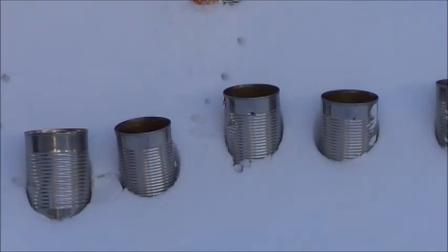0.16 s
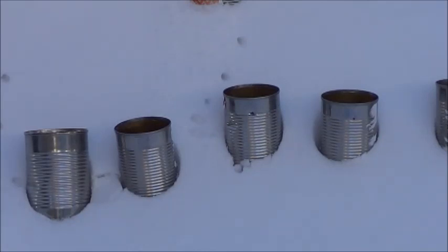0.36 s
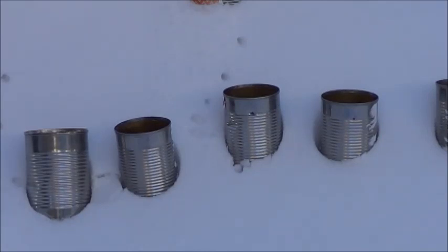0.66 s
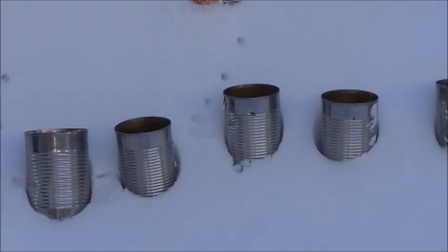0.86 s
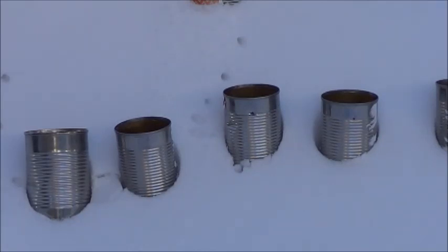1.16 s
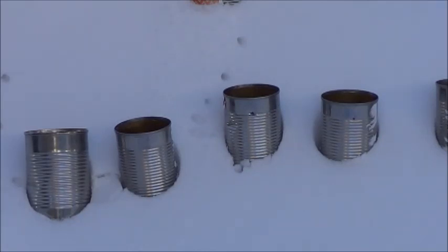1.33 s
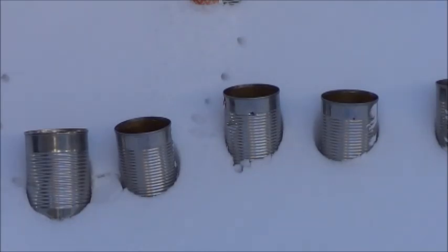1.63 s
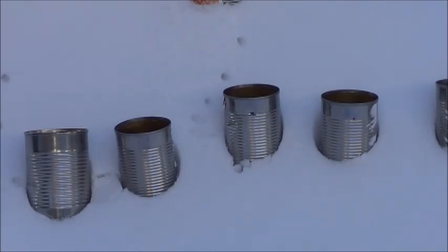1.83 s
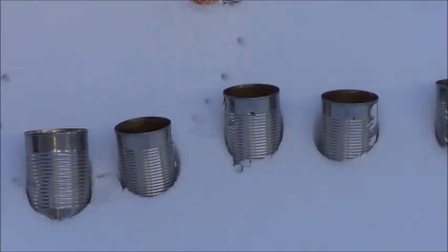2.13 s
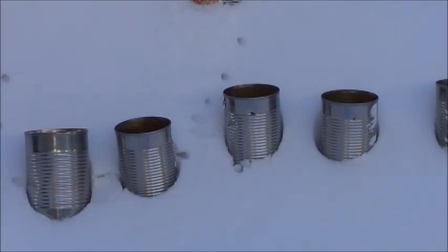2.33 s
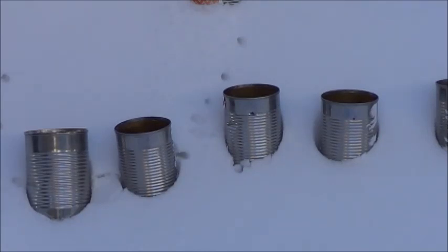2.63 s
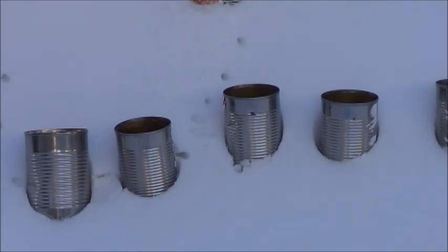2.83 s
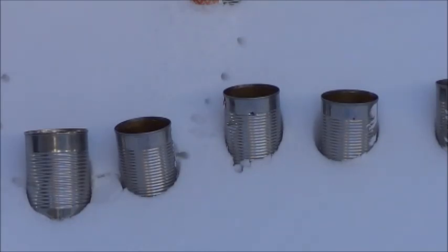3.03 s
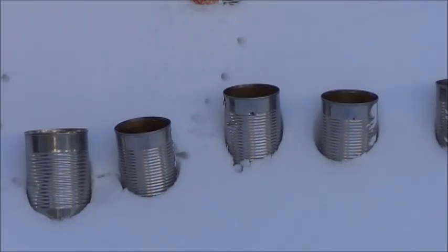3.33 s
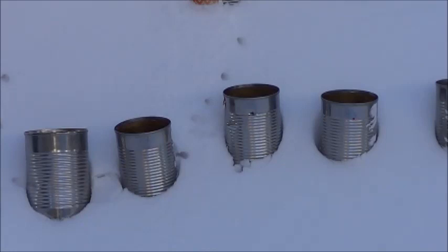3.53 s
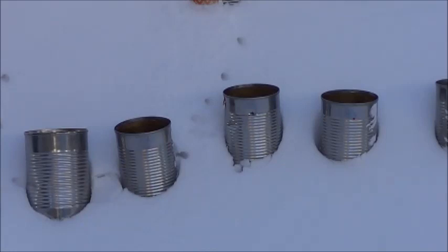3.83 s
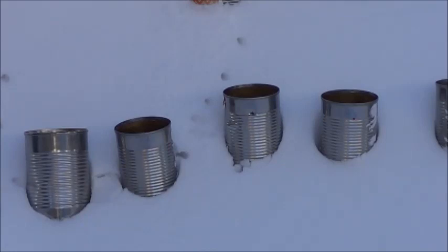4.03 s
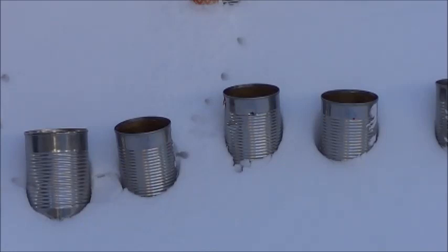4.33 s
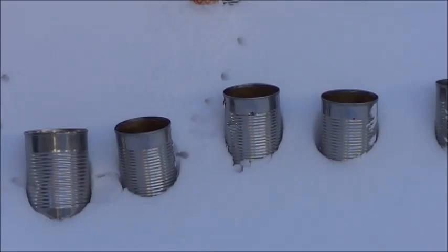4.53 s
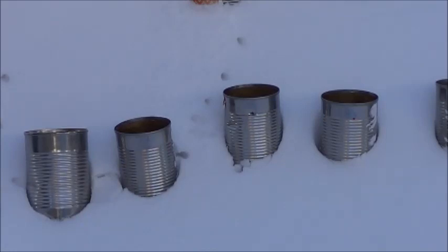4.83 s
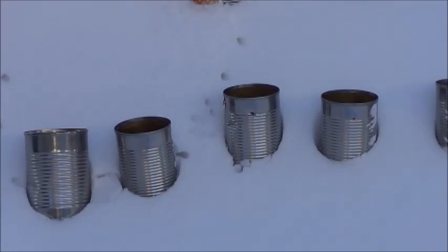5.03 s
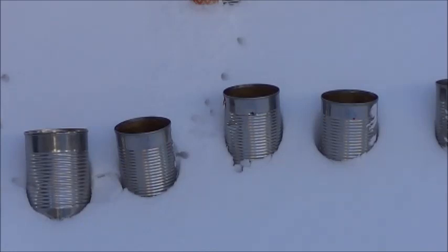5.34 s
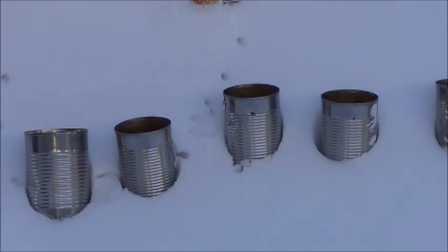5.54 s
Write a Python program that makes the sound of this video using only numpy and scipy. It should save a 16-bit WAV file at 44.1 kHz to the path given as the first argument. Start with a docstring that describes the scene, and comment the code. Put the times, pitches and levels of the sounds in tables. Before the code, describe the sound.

Crisp metal clicks, a cracking air-pistol shot with a short outdoor echo, recocking, low wind thumps, a second shot, then more clicks.

```python
"""Small far birds chip over rumble, hiss and a thin electronic whine, which last throughout: shaped noise and tones.
A gas pellet revolver is cocked, as resonant clicks; a bird pips and far whistles glide down.
The first shot is a hammer knock, a crack, a pop of filtered noise bursts and a swell of echoes round a snowy yard.
The action clicks and is cocked again, a gust of modulated low noise buffets the microphone, a second shot follows,
and the action is cocked once more. The gain ducks at each shot, holds, then creeps back up."""
import sys
import numpy as np
from scipy import signal
from scipy.fft import rfft, irfft
from scipy.io import wavfile
from scipy.ndimage import uniform_filter1d, minimum_filter1d

SR = 44100
rng = np.random.default_rng(int(sys.argv[2]) if len(sys.argv) > 2 else 0)


def to_wav(sig):
    """Store sig (one row per channel, or 1-D mono) as 16-bit WAV at the path in sys.argv[1].

    Samples outside -1..1 are clipped; the rate is SR.
    """
    pcm = np.clip(np.atleast_2d(sig), -1, 1) * 32767
    pcm = np.round(pcm).astype(np.int16)
    wavfile.write(sys.argv[1], SR, pcm.T)  # frames by channels


N = 250929
TIME = np.arange(N) / SR
HIT_TIME = TIME[:4096]  # time axis of a short sound


def undb(db):
    """Decibel definition: turn a level into an amplitude ratio."""
    return 10 ** (np.asarray(db) / 20)


def unit(x):
    """Normalization: scale to rms 1."""
    return x / np.sqrt(np.mean(x ** 2))


def sized(x, db):
    """Energy scaling: give a short sound, channels summed, the energy of 10 ms at this level."""
    return x * undb(db) * np.sqrt(SR / 100 / np.sum(x ** 2))


def ramp(t, start_s, length_s):
    """Linear envelope: rise from 0 to 1."""
    return np.clip((t - start_s) / length_s, 0, 1)


def bump(t, centre_s, width_s):
    """Gaussian envelope: a bell-shaped swell."""
    return np.exp(-((t - centre_s) / width_s) ** 2)


def colour(x, points):
    """Minimum-phase filtering: a causal (hz, db) response from the folded cepstrum."""
    size = 4096
    hz, db = np.transpose(points)
    log_hz = np.log(np.fft.rfftfreq(size, 1 / SR) + 1)
    log_gain = np.log(undb(np.interp(log_hz, np.log(hz), db)))
    cepstrum = irfft(log_gain)
    cepstrum[1:size // 2] *= 2
    cepstrum[size // 2 + 1:] = 0
    response = irfft(np.exp(rfft(cepstrum)))
    return signal.fftconvolve(x, response[None], axes=-1)[:, :x.shape[-1]]


def resonate(x, hz, width_hz):
    """Simple resonance: one mode with gain 1 at its centre."""
    return signal.lfilter(*signal.iirpeak(hz, hz / width_hz, fs=SR), x)


def ring(x, hz, width_hz, db):
    """Cascaded resonance: two equal modes give steep skirts, at a set energy."""
    once = resonate(x, hz, width_hz)
    return sized(resonate(once, hz, width_hz), db)


def dull(x, hz, order=1):
    """Low-pass filtering: treble falls away above a cutoff."""
    return signal.sosfilt(signal.butter(order, min(hz, SR / 2 - 1), fs=SR, output="sos"), x)


def noise(likeness, size=N):
    """Partial coherence: stereo noise with a given left-right correlation."""
    mid, side = rng.standard_normal((2, size))
    c = np.clip(likeness, 0, 1)
    mid = mid * np.sqrt((1 + c) / 2)
    side = side * np.sqrt((1 - c) / 2)
    return np.array([mid + side, mid - side])


def burst(decay_s, likeness):
    """Exponential decay: a puff of noise that starts at once and dies away."""
    return noise(likeness, size=len(HIT_TIME)) * np.exp(-HIT_TIME / max(decay_s, 1 / SR))


def click(decay_s, likeness):
    """Gradual onset: a noise burst takes a moment to build up, then dies away."""
    return burst(decay_s, likeness) * (1 - np.exp(-HIT_TIME / 0.00068))


def widen(x, points):
    """Mid-side decomposition: colour the difference between left and right."""
    mid = (x[0] + x[1]) / 2
    side = colour((x[:1] - x[1:]) / 2, points)[0]
    return np.array([mid + side, mid - side])


def add(out, s, x, pan_db=0):
    """Superposition: mix a sound in at a time and a left-minus-right balance."""
    i = int(s * SR)
    out[:, i:i + x.shape[1]] += x[:, :N - i] * undb([[pan_db / 2], [-pan_db / 2]])


# shots: pop_s, level_db (scales fronts and echoes), hammer_lead_s
SHOTS = [(2.3053, -1, 0.0068), (4.9418, -1.5, .0075)]
# sharp pressure fronts: after_pop_s, energy_db, decay_s, dull_above_hz, left_minus_right_db
FRONTS = [(-.0023, -27.5, 0.00029, 14000, -4), (0, -23.5, 0.00025, 4000, -12),
          (.0082, -26, 0.00032, 8000, 2), (0.0882, -18, 0.00096, 7000, 0)]
# spectrum of the gas burst: frequency_hz, gain_db
BURST_COLOUR = [(40, -13), (200, -13.5), (500, -2.5), (1100, 3.5), (2500, -3), (7000, -4.5), (11000, 2.5),
                (15500, -2)]
# hollow echoes from large surfaces: after_pop_s, energy_db, centre_hz
HOLLOWS = [(.031, -29, 2570), (.039, -38, 1340), (.0525, -17.5, 1630), (.051, -17.5, 2900),
           (.061, -29, 900), (.094, -27, 1900), (.102, -28.5, 915), (.105, -23.5, 3460)]
HOLLOW_WIDTH_HZ, HOLLOW_DECAY_S = 720, 0.004  # width of each of two cascaded resonances; burst decay
HAMMER_HZ = 1640


def shots(echo):
    """Impulsive radiation and specular reflection: a fixed gun gets the same echo pattern twice."""
    out = np.zeros((2, N))
    thud = ring(signal.unit_impulse(len(HIT_TIME))[None], 384, 430, 0)  # the low push behind every front
    arrivals = [(0.0026, echo, 0)]
    for s, db, decay, hz, pan in FRONTS:
        gas = colour(burst(decay, 1.0), BURST_COLOUR)
        arrivals.append((s, sized(dull(gas, hz), db) + undb(db - 27) * thud, pan))
    for s, db, hz in HOLLOWS:
        arrivals.append((s, ring(burst(HOLLOW_DECAY_S, 1.0), hz, HOLLOW_WIDTH_HZ, db), 0))
    for s, db, lead in SHOTS:
        # the hammer scrapes forward and knocks the valve open
        add(out, s - lead - .003, sized(metal(burst(0.009, 0.31)), -35), pan_db=-18)
        add(out, s - lead, ring(burst(0.00052, 0.69), HAMMER_HZ, 810, -29.0), pan_db=-14.5)
        for delay, sound, pan in arrivals:
            add(out, s + delay, undb(db) * sound, pan)
    return out


# spectrum of the yard's echo: frequency_hz, gain_db
YARD_COLOUR = [(60, -22), (190, -21), (400, -1), (580, -8.5), (900, -3), (1400, 0.5), (2300, -0.5),
               (3400, 0), (4300, 0.5), (7300, 0), (9500, 3), (12000, -0.5), (15500, -5)]
# pitches that the echoes reinforce: pitch_hz, width_hz, gain_db
YARD_RINGS = [(716, 20, 7.5), (867, 15, 7.5), (976, 28, 6), (1653, 11, 4), (2120, 33, 3), (2200, 23, 5.5),
              (2640, 20, 0), (2670, 16, -11), (2870, 18, 6.5), (3290, 43, 6.5), (3560, 25, -6),
              (6250, 18, -1), (8660, 19, 4)]
# scatter from things close by, a swell from surrounding walls and trees, then a steady decay;
# levels are relative to one another, and T60 is the time to fall by 60 dB
NEAR_DB, NEAR_T60_S = -20.5, 0.24
SWELL_DB, SWELL_PEAK_S, SWELL_WIDTH_S = -12.5, 0.044, 0.015
TAIL_DB, TAIL_ARRIVES_S, TAIL_RISE_S, TAIL_T60_S = -11, 0.021, 0.012, 0.48


def yard_echo():
    """Diffuse reverberation: one second of dense scatter from trees, fences and walls."""
    t = TIME[:SR]
    late = np.maximum(t - TAIL_ARRIVES_S, 0)
    near = undb(NEAR_DB - 60 * t / NEAR_T60_S)
    swell = undb(SWELL_DB) * bump(t, SWELL_PEAK_S, SWELL_WIDTH_S)
    tail = undb(TAIL_DB - 60 * late / TAIL_T60_S) * (1 - np.exp(-late / TAIL_RISE_S))
    # some facets reflect more than others
    facet_db = 2.5 * np.repeat(rng.standard_normal(SR), 24)[:SR]
    facets = unit(undb(facet_db))
    scatter = 0
    for envelope, likeness in [(near, .3), (swell, .85), (tail, .52)]:
        reflections = colour(noise(likeness, size=SR) * facets, YARD_COLOUR)
        scatter = scatter + envelope * unit(reflections)
    # long waves arrive alike at both ports
    scatter = widen(scatter, [(400, -21), (1200, -2.0), (4000, 2.0), (9000, 0.0), (13000, 8)])
    # these pitches build up with the swell and linger after it
    rings = sum(undb(db) * resonate(scatter.mean(0), hz, width) for hz, width, db in YARD_RINGS)
    return undb(-1.9) * scatter + undb(-2) * rings


# resonances of the gun's metal: frequency_hz, width_hz, gain_db
METAL = [(2680, 300, 11.5), (3030, 510, 5), (3760, 400, 4.5), (4860, 950, 3.5), (5670, 2100, -4),
         (6940, 1400, -8.5), (8970, 1300, 2), (9700, 570, 3), (11400, 1000, -11), (12400, 780, -5),
         (14100, 1100, -28)]


def metal(x):
    """Modal superposition: the gun's metal sounds as a sum of resonances."""
    return sum(undb(db) * resonate(x, hz, width) for hz, width, db in METAL)


# clicks of the action, and at 1.026 s a faint chip, probably a bird, borrowing the pawl's resonances:
# start_s, energy_db (scales the whole click), part
CLICKS = [(.2390, -30, "pawl"), (.2620, -29.5, "cylinder"), (0.3138, -27.5, "sear"), (1.026, -44, "pawl"),
          (2.604, -38, "spring"), (2.6395, -32.5, "lever"), (2.7005, -21.5, "trigger"),
          (2.7056, -35, "pawl"), (3.006, -36.5, "pawl"), (3.052, -30, "cylinder"), (3.1194, -27.5, "sear"),
          (5.2512, -40, "spring"), (5.2905, -31.5, "lever"), (5.3104, -31.5, "cylinder"),
          (5.3311, -21, "trigger"), (5.5927, -29, "pawl"), (5.616, -27, "cylinder"), (5.6565, -28, "sear")]
# voices of the parts; cocking sounds pawl, cylinder, sear; letting go sounds mainly spring, lever, trigger,
# with an extra pawl or cylinder click:
# part, low_ring_hz, low_ring_db, high_ring_hz, high_ring_db, decay_s, frame_knock_db, treble_db,
# left_minus_right_db
PARTS = [("pawl", 2760, -6, 6100, -8.5, 0.0023, -2, -10.5, -11),
         ("cylinder", 3420, -9.5, 11200, -3.5, 0.00091, -5, -4.5, -7),
         ("sear", 2870, -7.5, 6320, -7, .0016, -17, 3, -8.5),
         ("spring", 4700, -13, 12000, -8, 0.0011, -17, -4, -4),
         ("lever", 3370, -1.5, 5440, 1.1, 0.0011, -10, -2.6, -11.5),
         ("trigger", 2100, -18, 5120, -2.1, 0.0021, -11.5, 1.5, -5)]
# short scrapes and dull knocks of the action; the one at 0 s is the tail of an earlier click:
# start_s, energy_db, decay_s, centre_hz, width_hz
SCRAPES_AND_KNOCKS = [(0, -34, 0.041, 7460, 9300), (0.218, -40, 0.037, 5030, 7000),
                      (.249, -36, 0.0052, 1880, 1200), (2.984, -41, 0.024, 6960, 8140),
                      (3.071, -40, 0.02, 10500, 4000), (5.606, -40.5, 0.0043, 1880, 900)]
FRAME_HZ = 1930


def action(echo):
    """Impact excitation: contacts shake the metal, ring the parts and knock the frame; the yard answers."""
    out = np.zeros((2, N))
    voices = {name: voice for name, *voice in PARTS}
    for s, db, part in CLICKS:
        low_hz, low_db, high_hz, high_db, decay, knock_db, treble_db, pan = voices[part]
        contact = click(decay, 0.72) + undb(-16.0) * burst(0.014, 0.58)
        body_colour = [(300, -22), (1500, -12.0), (4000, -6.5), (10000, treble_db)]
        body = sized(colour(metal(contact), body_colour), 0)
        low_ring = ring(click(decay, 0.26), low_hz, 750, low_db)
        high_ring = ring(click(decay, 0.18), high_hz, 530, high_db)
        knock = ring(contact, FRAME_HZ, 840, knock_db)
        add(out, s, undb(db) * (body + low_ring + high_ring + knock), pan)
    for s, db, decay, hz, width in SCRAPES_AND_KNOCKS:
        add(out, s, ring(metal(burst(decay, 0.73)), hz, width, db), pan_db=-9.5)
    unit_echo = echo / np.sqrt(np.sum(echo ** 2) / 2)
    answer = signal.fftconvolve(out, unit_echo, axes=-1)[:, :N]
    return out + undb(-13.5) * answer


# spectrum of the gust: frequency_hz, gain_db
WIND_COLOUR = [(15, -64), (25, -25.5), (76, -1.5), (114, 0), (223, -4), (557, -17.5), (719, -20),
               (823, -21), (900, -43), (1170, -48), (1980, -120)]
# single buffets: start_s, energy_db (before stereo widening)
BUFFETS = [(2.544, -42), (2.652, -40.5), (3.489, -36), (3.686, -30.5), (3.967, -30), (4.024, -28),
           (4.239, -33.5), (4.458, -31), (4.484, -29), (4.636, -31.5), (5.212, -30.5), (5.33, -30.5),
           (5.53, -34.5)]
# one gust builds, holds, surges once and drops; its level is set before stereo widening
GUST_DB, GUST_START_S, GUST_RISE_S, GUST_END_S, GUST_FALL_S = -41.5, 3, 0.67, 5.686, 0.24
SURGE_DB, SURGE_S, SURGE_WIDTH_S = 8.5, 4.5, 0.11
EDDY_HZ, EDDY_DEPTH_DB = 33.8, 3.5  # flutter cutoff, rms depth
BUFFET_HZ, BUFFET_REF_DB, BUFFET_DB_PER_OCTAVE = 373, -27.5, 8.5  # harder buffets are brighter


def wind():
    """Turbulent pressure fluctuation: eddies thump unevenly on the microphone while a gust passes."""
    gust = ramp(TIME, GUST_START_S, GUST_RISE_S) * ramp(-TIME, -GUST_END_S, GUST_FALL_S)
    gust_db = GUST_DB + SURGE_DB * bump(TIME, SURGE_S, SURGE_WIDTH_S)
    eddies = unit(dull(rng.standard_normal(N), EDDY_HZ, order=2))
    uneven = noise(0.64) * undb(EDDY_DEPTH_DB * eddies)
    flow = dull(colour(uneven, WIND_COLOUR), 670, order=2)
    out = unit(flow) * undb(gust_db) * gust
    for s, db in BUFFETS:
        cutoff_hz = BUFFET_HZ * 2 ** ((db - BUFFET_REF_DB) / BUFFET_DB_PER_OCTAVE)
        thump = resonate(burst(0.0045, 0.55), 206, 310)
        add(out, s, sized(dull(thump, cutoff_hz, order=2), db))
    # big eddies reach both ports, small ones only one
    return widen(out, [(60, 4), (110, 1), (200, 8.3), (400, 10.6), (900, 9.5)])


# far whistles: start_s, length_s, pitch_hz (at the start), level_db (twice the envelope's peak)
WHISTLES = [(1.37, .1, 7150, -52), (1.86, 0.32, 3460, -49), (4.15, 0.45, 3600, -56)]
WHISTLE_SAG_PER_S = .5  # share of the pitch lost by the end, per second of length


def whistles():
    """Frequency glide: faint bird tones swell, fade and sag at the end, blurred by distance."""
    out = 0
    for s, length, hz, db in WHISTLES:
        progress = ramp(TIME, s, length)
        pitch = hz * (1 - WHISTLE_SAG_PER_S * length * progress ** 3)
        envelope = np.sqrt(progress * (1 - progress))
        out = out + undb(db) * envelope * np.sin(2 * np.pi * np.cumsum(pitch) / SR)
    flutter = unit(dull(noise(0.58), 70, order=2))
    return out * unit(1 + 0.97 * flutter)


PIP_START_S, PIP_PERIOD_S, PIP_HZ, PIP_DB = .44, 0.086, 5730, -55  # mean energy level


def pips(count=9):
    """Periodic excitation: one small bird repeats a thin resonant pip at an even pace."""
    out = np.zeros((2, N))
    for k, chance in enumerate(rng.standard_normal(count)):
        pip = ring(click(.005, .6), PIP_HZ, 200, PIP_DB + 1.2 * chance)
        add(out, PIP_START_S + k * PIP_PERIOD_S, pip)
    return out


def chips(count=40):
    """Random superposition: small far birds chatter as resonant bursts, faintly, in the first second."""
    out = np.zeros((2, N))
    for when, pitch, strength in rng.random((count, 3)):
        pitch_hz = 2900 + 3700 * pitch ** 2
        add(out, 0.049 + 1.0 * when, ring(click(0.0042, 1.0), pitch_hz, 1100, -57 + 5 * strength))
    return out


# spectrum of distant rumble and hiss: frequency_hz, gain_db
AIR_COLOUR = [(25, -19.5), (60, -7), (120, -9), (290, -6), (540, -2), (950, -4), (1500, -7.5), (3100, -9),
              (5200, -11.5), (7500, -11), (11000, -12.5), (15500, -16.5)]
AIR_DB, WHINE_DB, TONES_DB = -46.5, -58, -59  # rms levels


def background():
    """Stationary noise and beating: coherent rumble, wide hiss, an electronic whine and two close high tones."""
    shared = dull(noise(0.72), 840)
    air = unit(colour(undb(-0.5) * shared + undb(-1.0) * noise(0.26), AIR_COLOUR))
    whine = unit(resonate(resonate(noise(0.86), 1850, 87), 1850, 87))
    lower_tone = np.sin(2 * np.pi * 15734.4 * TIME)
    upper_tone = np.sin(2 * np.pi * 15747.3 * TIME)
    tones = unit(lower_tone + .56 * upper_tone)
    return undb(AIR_DB) * air + undb(WHINE_DB) * whine + undb(TONES_DB) * tones


CEILING_DB, HOLD_S, RECOVERY_DB_PER_S = -12, 0.81, 3


def gain_control(x):
    """Dynamic range compression: from 0 dB, loud sound ducks the gain; it holds, then creeps up."""
    power = uniform_filter1d(np.mean(x ** 2, axis=0), size=660)  # averaged over 15 ms
    level_db = 10 * np.log10(power + 1e-12)
    allowed_db = np.where(TIME > 0, CEILING_DB - level_db, 0)
    hold = int(HOLD_S * SR)
    held_db = minimum_filter1d(allowed_db, hold, origin=(hold - 1) // 2, mode="nearest")
    creep_db = RECOVERY_DB_PER_S * TIME
    # a running minimum against the rising line limits the speed of recovery
    return x * undb(np.minimum.accumulate(held_db - creep_db) + creep_db)


def scene():
    """Linear superposition: all sources add, and the shots and the action share one yard echo."""
    echo = yard_echo()
    return shots(echo) + action(echo) + wind() + whistles() + pips() + chips() + background()


# stereo width of the microphone pair: frequency_hz, side_gain_db
WIDTH = [(50, -8), (110, -3), (250, -5), (700, -1.5), (1500, 1.5), (4400, 1), (8000, 1.5), (11000, -4.5),
         (12500, -10.5), (15000, -22)]
TOP_HZ = 15900


def record(dry):
    """Transduction and saturation: the pair narrows at both ends, gain rides, peaks round, the top is cut."""
    stereo = widen(dry, WIDTH)
    rounded = np.tanh(gain_control(stereo))
    return signal.sosfilt(signal.ellip(10, .2, 80, TOP_HZ, fs=SR, output="sos"), rounded)


dry = scene()
out = record(dry)
to_wav(out)
```